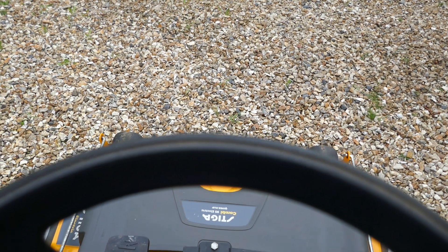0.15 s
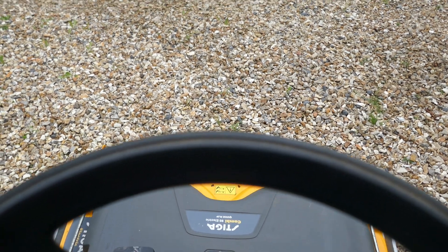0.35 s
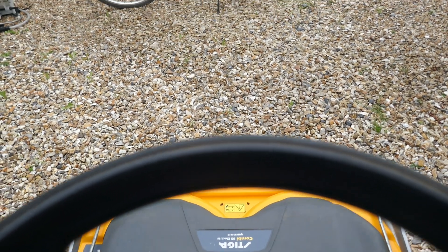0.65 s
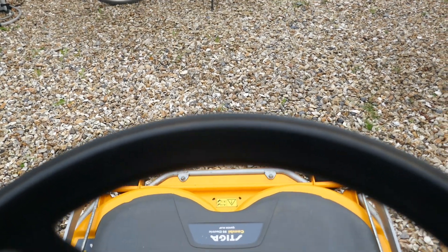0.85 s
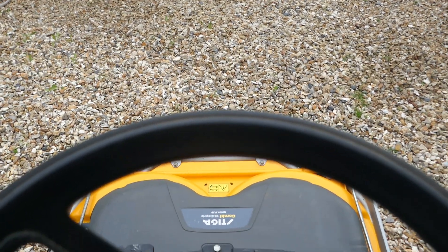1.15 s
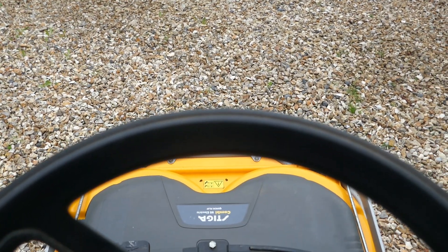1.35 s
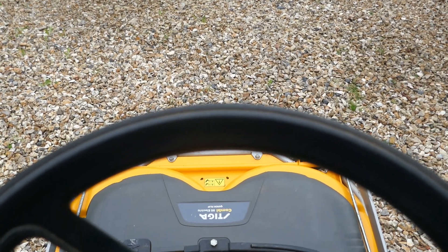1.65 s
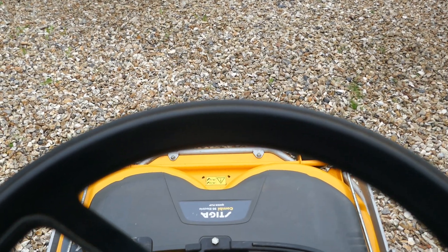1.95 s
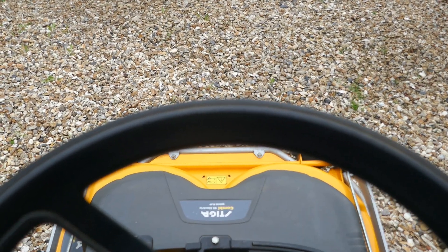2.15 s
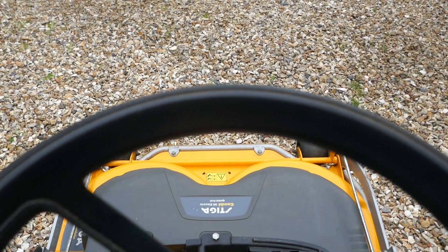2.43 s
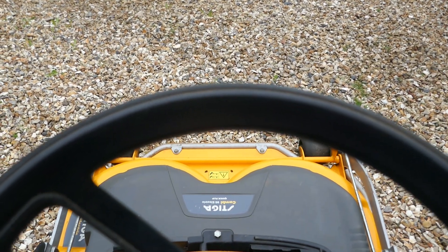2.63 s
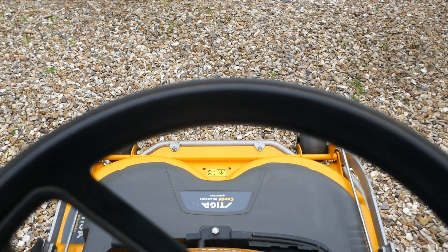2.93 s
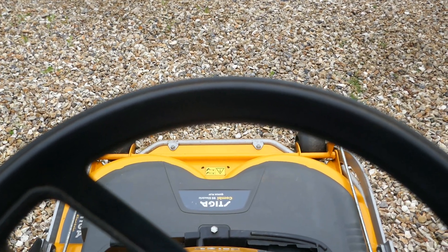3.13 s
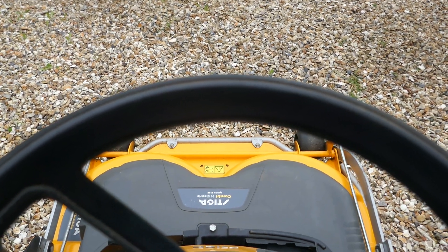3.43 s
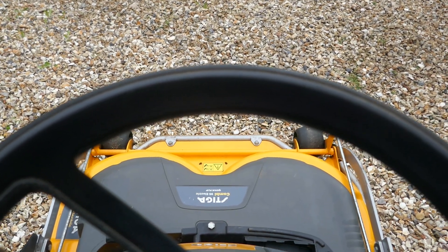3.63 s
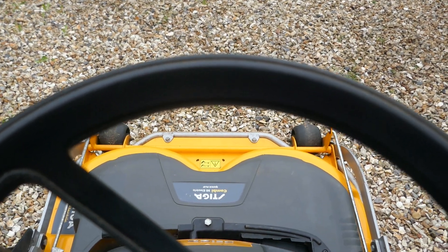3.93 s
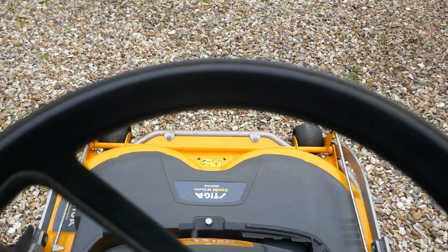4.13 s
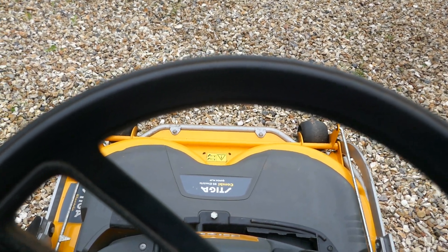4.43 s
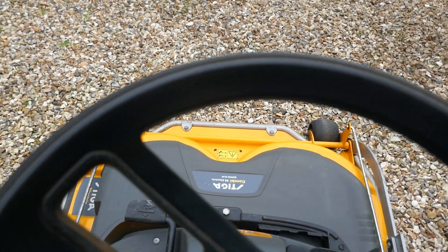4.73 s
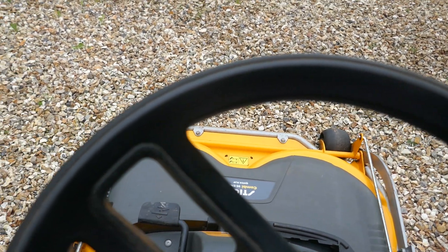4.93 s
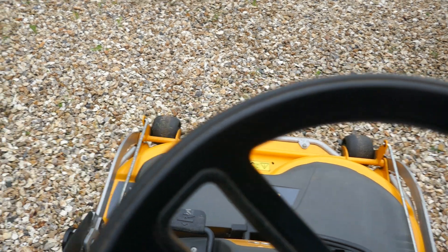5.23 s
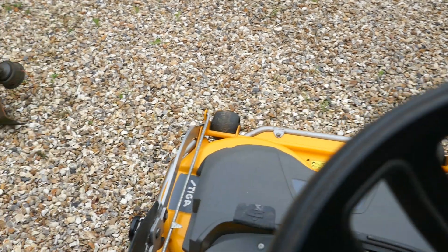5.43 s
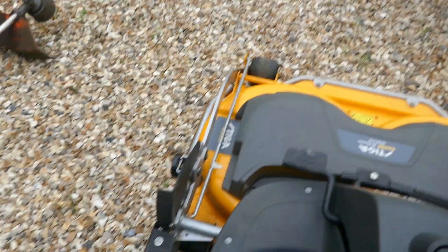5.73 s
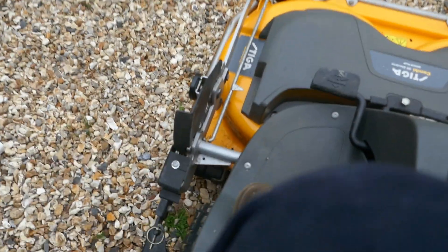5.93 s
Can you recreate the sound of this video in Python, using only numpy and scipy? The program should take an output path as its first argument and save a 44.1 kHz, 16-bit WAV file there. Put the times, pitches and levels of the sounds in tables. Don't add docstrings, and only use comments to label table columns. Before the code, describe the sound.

Outdoors, recorded very close from the driver's seat of a small ride-on mower. Quiet low ambience and faint microphone hiss at first, with a dull bump at 0 s, a slight boot scuff, a hard hollow knock at 0.5 s, softer thuds, and small seat creaks around 0.8 and 1.25 s. At about 1.55 s the starter engages: quick irregular clanks, thumps and a brief scrape. The engine catches around 2 s and settles into a steady single-cylinder idle, about eighteen thuds a second, with muffler ring, pump hum, frame rumble and rattling panels. At 3.7-3.9 s it speeds up with a harder, louder bark, then again near 4.4 s to about twenty-five beats a second, holding steady with more hiss and rattle. From 5.3 s the driver stands: cloth rustles increasingly close, a panel knock at 5.57 s, a sharp click at 5.7 s. The engine runs on, slightly softer in its low thud, to 6 s.

```python
import sys
import numpy as np
from scipy import signal
from scipy.fft import rfft, irfft, next_fast_len
from scipy.io import wavfile
from scipy.ndimage import uniform_filter1d

SR = 44100
rng = np.random.default_rng(int(sys.argv[2]) if len(sys.argv) > 2 else 0)


def generate_wav(signal):
    frames = np.transpose(np.atleast_2d(signal))
    scaled = np.clip(frames, -1, 1) * 32767
    pcm = np.round(scaled).astype(np.int16)
    wavfile.write(sys.argv[1], SR, pcm)


def boost_factor(decibels):
    exponent = np.asarray(decibels, float) / 20
    return 10 ** exponent


N = 268128
TIME = np.arange(N) / SR
BINS, FRAMES = np.fft.rfftfreq(1024, 1 / SR), np.arange(N // 256 + 5) * 256 / SR
KEY_S, CAUGHT_S, STANDS_UP_S = 1.55, 1.95, 5.35


def evened(x):
    return x / np.sqrt(np.mean(x ** 2) + 1e-20)


def read(points, hz):
    f, value = np.transpose(points)
    return np.interp(np.log(hz + 1), np.log(f + 1), value)


def paint(colour):
    return boost_factor(read(colour, BINS))[:, None]


def curves(rows):
    s, *columns = np.transpose(rows)
    return [np.interp(TIME, s, c) for c in columns] + [1. * (TIME >= s[0])]


def ramp(start_s, length_s):
    return np.clip((TIME - start_s) / length_s, 0, 1)


def strokes(rows, edge_s):
    power = 0
    for start_s, length_s, level_db in rows:
        shape = ramp(start_s, edge_s) * (1 - ramp(start_s + length_s, edge_s))
        power = power + boost_factor(level_db) ** 2 * shape ** 2
    return power


def add(mix, start_s, sound):
    part = mix[round(start_s * SR):][:len(sound)]
    part += sound[:len(part)]


# freq_hz, likeness_0_1
LIKENESS = [(30, .8), (70, .97), (300, .97), (600, .93), (1200, .8), (2200, .7), (4000, .4), (9000, .45),
            (14000, .4)]


def noise(field, patchy_db):
    a, b, c, d, patches = rng.standard_normal((5, 513, len(FRAMES)), dtype=np.float32)
    patches = uniform_filter1d(patches, size=4, axis=0)
    patches = evened(uniform_filter1d(patches, size=14, axis=1))
    same = np.clip(read(LIKENESS, BINS), 0, 1)[:, None]
    left = a + 1j * b
    right = same * left + np.sqrt(1 - same ** 2) * (c + 1j * d)
    z = np.array([left, right]) * field * boost_factor(patchy_db * patches)
    return evened(signal.istft(z, nperseg=1024, noverlap=768)[1][:, :N])


# time_s, firings_per_s
SPEED = [(2.09, 15.559), (2.25, 18.387), (2.45, 18.212), (2.85, 18.638), (3.2, 18.305), (3.45, 18.619),
         (3.65, 18.408), (3.85, 21.68), (4.0, 22.169), (4.17, 22.065), (4.45, 24.815), (4.6, 25.185),
         (4.8, 24.769), (5.05, 25.036), (5.8, 24.879), (6.08, 25.328)]


def crank():
    speed, on = curves(SPEED)
    first_turn = .002
    return first_turn + np.cumsum(speed * on) / SR


def above_idle():
    speed, on = curves(SPEED)
    return speed - 18.4


def dying_rings(rows, rough, rise_s, cycles=3):
    out, t = np.zeros(N), np.arange(6000) / SR
    for start_s, peak_db, hz, t60_s in rows:
        window = np.hanning(int(cycles * SR / hz))
        smear = evened(np.convolve(rng.standard_normal(len(t)), window, "same"))
        shape = boost_factor(peak_db + 3 - 60 * t / t60_s) * (1 - np.exp(-t / rise_s))
        add(out, start_s, shape * (1 - rough + rough * smear) * np.sin(2 * np.pi * hz * t))
    return out


# freq_hz, level_db_per_hz
AIR = [(29, -42), (50, -18), (70, -1.5), (124, -1.5), (347, -6.5), (470, 1), (575, -5), (716, 4),
       (805, -26), (1050, -26), (1170, -4.5), (1430, -6), (1580, -14.5), (1970, -7), (2800, -22.5),
       (3640, -53), (6160, -120)]
# freq_hz, level_db_per_hz
SELF_NOISE = [(2000, -23), (2800, -8), (4800, -4), (5600, -8), (7900, -11), (10000, -4.5), (12000, -7.5),
              (15000, -14), (15700, -5)]


def background():
    colour = np.hypot(paint(AIR), boost_factor(-20.5) * paint(SELF_NOISE))
    side_db = -50 + 6 * np.array([[.5], [-.5]])
    return boost_factor(side_db) * noise(colour, patchy_db=1.5)


# start_s, peak_db, pitch_hz, t60_s
BLOWS = [(0.0, -25.5, 280, 0.041), (0.103, -36, 219, 0.18), (0.135, -32, 270, 0.046),
         (0.163, -35, 217, 0.08), (0.433, -36, 127, 0.074), (0.515, -13.5, 323, 0.034),
         (0.522, -16.5, 153, 0.045), (0.526, -13, 189, 0.042), (0.553, -19, 380, 0.045),
         (0.641, -26, 110, 0.085), (0.682, -29, 153, 0.032), (0.704, -31, 105, 0.076),
         (0.892, -45, 99, 0.13), (1.039, -21.5, 218, 0.03), (1.203, -32.5, 390, 0.07),
         (1.587, -9, 267, 0.13), (1.609, -12, 241, 0.063), (1.723, -4.5, 263, 0.033),
         (1.745, -2.5, 202, 0.11), (1.8, -10.5, 124.9, 0.1), (1.826, -10.5, 267, 0.1),
         (1.884, -3, 205, 0.21), (1.9198, -11.5, 195, 0.32), (1.973, -10, 157, 0.11),
         (2.008, -7.5, 152, 0.16), (2.034, -8.5, 252, 0.065), (2.053, -4.5, 191, 0.19),
         (2.092, -9.5, 152, 0.094)]


def body_blows():
    return dying_rings(BLOWS, rough=0.35, rise_s=0.0036)


# freq_hz, level_db_per_hz
RUMBLE = [(40, -50), (100, -30), (180, -14), (260, -4), (350, 0), (460, -8), (570, -2), (670, -18),
          (900, -22), (1200, -50), (3000, -110)]
# freq_hz, level_db_per_hz
RATTLE = [(350, -17), (600, -26), (667, -18), (742, -5.5), (953, -13.5), (1050, -9), (1200, -14.5),
          (1600, -13.5), (2520, -26), (2970, -34.5), (6000, -52), (7800, -80), (13200, -120)]
# start_s, length_s, level_db
SCUFF = [
    (.09, 0.093, -27.5),
]
STILL_S = 1.3
CRANKED_DB, RUNNING_DB = (-27.5, -37.5), (-24, -35.5)
KNOCKED_DB, KNOCKED_T60_S = (-20, -38), 0.065
RESTING_DB, EXPOSED_DB = -53.5, 4
RATTLE_SPEED_DB = 0.3641


def shake(turns):
    caught, t = ramp(CAUGHT_S, 0.14), np.arange(6000) / SR
    knocked = np.sqrt(strokes(SCUFF, 0.031))
    for start_s, peak_db, hz, t60_s in BLOWS:
        if start_s < KEY_S:
            add(knocked, start_s, boost_factor(peak_db - 60 * t / KNOCKED_T60_S) * (1 - np.exp(-t / 0.0012)))
    rumble, rattle = (ramp(KEY_S, 0.023) * boost_factor(a + (b - a) * caught)
                      for a, b in zip(CRANKED_DB, RUNNING_DB))

    rattle = rattle * boost_factor(RATTLE_SPEED_DB * np.maximum(above_idle(), 0) + EXPOSED_DB * ramp(STANDS_UP_S, 1.0))
    burst_db = 3 * np.exp(-((turns - .13) % 1) / 0.17)
    jolts = rattle * boost_factor(burst_db)
    jolts += boost_factor(RESTING_DB) * (1 - 0.41 * ramp(STILL_S, .05))
    jolts += boost_factor(KNOCKED_DB[1]) * knocked
    for start_s, peak_db, hz, t60_s in CLANKS:
        add(jolts, start_s, boost_factor(peak_db - 3 - 60 * t / t60_s) * (1 - np.exp(-t / 0.00054)))

    stir_db = 1.8 * np.cos(2 * np.pi * (turns - .15))
    away_db = -3 * ramp(STANDS_UP_S, 0.47)
    rumble = rumble * boost_factor(-1.0 + stir_db + away_db) + boost_factor(KNOCKED_DB[0]) * knocked
    return rumble * noise(paint(RUMBLE), patchy_db=0.5) + jolts * noise(paint(RATTLE), patchy_db=1.5)


# start_s, peak_db, pitch_hz, t60_s
CREAKS = [
    (0.3373, -41, 2010, 0.14),
    (0.7876, -32.5, 2010, 0.088),
    (1.1097, -47, 1800, 0.27),
    (1.143, -44, 1800, 0.2),
    (1.263, -26.5, 2070, 0.065),
]


def seat_creaks():
    return dying_rings(CREAKS, rough=.8, rise_s=.02, cycles=9)


# start_s, peak_db, pitch_hz, t60_s
CLANKS = [(0.5173, -33, 1355, 0.033), (1.5588, -29.5, 1574, 0.19), (1.5768, -21.5, 1720, 0.1),
          (1.6342, -33.5, 1350, 0.1), (1.7831, -24.5, 1486, 0.086), (1.805, -32, 1250, 0.27),
          (1.841, -25, 1880, 0.063), (1.8744, -35, 1290, 0.036), (1.917, -29, 1270, 0.034),
          (1.95, -35, 1480, 0.051), (2.0109, -21.5, 1410, 0.087), (2.03, -51, 1380, 0.09),
          (2.0858, -19, 1367, 0.044), (2.134, -29, 1420, 0.036)]


def gear_clanks():
    return dying_rings(CLANKS, rough=0.75, rise_s=0.0024)


# start_s, peak_db, pitch_hz, t60_s
RINGS = [(0.519, -8, 437, 0.02), (1.204, -32, 760, 0.049), (1.563, -21.5, 595, 0.11),
         (1.578, -8, 585, 0.066), (1.622, -8.5, 560, 0.034), (1.689, -16.5, 607, 0.096),
         (1.759, -8, 557, 0.063), (1.799, -7.5, 584, 0.084), (1.844, -20, 630, 0.053),
         (1.884, -36, 515, 0.045), (1.996, -11, 550, 0.032), (2.034, -26, 637, 0.044),
         (5.53, -28, 567, 0.045), (5.568, -9, 563, 0.036)]


def panel_rings():
    return dying_rings(RINGS, rough=0.073, rise_s=0.0069)


# freq_hz, level_db_per_hz
GRIND = [(1180, -33), (2000, -4), (4190, -22), (4560, -12.5), (5510, -21), (6270, -21), (8110, -22.5),
         (9880, -17), (14500, -28), (15600, -30)]
# freq_hz, level_db_per_hz
CLOTH = [(1760, 4), (3000, 1), (4180, -6.5), (5280, -4.5), (5770, -9), (6960, -7.5), (8910, -4),
         (10500, -3), (11700, -7), (14000, -10), (15600, -19)]
# freq_hz, level_db_per_hz
FAN = [(3000, -43), (4400, -2.5), (5100, 0), (5800, -8), (7500, -7), (9500, -3.5), (10500, -3),
       (12000, -13), (15600, -10)]
# start_s, length_s, level_db
SCRAPES = [
    (1.565, 0.042, -44),
    (1.6, 0.21, -51.5),
    (1.775, 0.058, -39),
    (1.83, 0.049, -45),
    (2.0, .05, -55),
    (2.085, 0.055, -54),
]
# start_s, length_s, level_db
RUBS = [
    (3.82, 0.079, -58),
    (4.72, .45, -55.5),
    (5.33, .8, -49),
    (5.45, .8, -47),
    (5.58, .6, -45),
    (5.8, .4, -43),
]


def hiss():
    fan_db = -61.5 + 0.35 * above_idle()
    fan = boost_factor(fan_db) ** 2 * (1e-4 + ramp(KEY_S, 0.68))
    powers = [strokes(SCRAPES, 0.012), strokes(RUBS, 0.035), fan]
    total = sum(powers)
    field = 0
    for power, colour in zip(powers, (GRIND, CLOTH, FAN)):
        field = field + np.interp(FRAMES, TIME, power / total) * evened(paint(colour)) ** 2
    return np.sqrt(total) * noise(np.sqrt(field), patchy_db=1.2)


# firing_rate_multiple, level_db
ROCKING = [(2, -60)]


def rocking(turns):
    speed_db = 2 * above_idle()
    orders = sum(boost_factor(db + speed_db) * np.sin(2 * np.pi * k * turns) for k, db in ROCKING)
    return ramp(CAUGHT_S, .2) * orders


# start_s, peak_db, pitch_hz, t60_s
SNAPS = [
    (2.087, -44, 3980, .05),
    (3.846, -50, 12500, 0.13),
    (5.405, -41, 6900, 0.017),
    (5.591, -41, 11900, .04),
    (5.6934, -31, 9900, .006),
    (5.6995, -15.5, 9060, 0.011),
    (5.7, -30, 3670, .008),
    (5.7463, -34, 11000, .013),
]


def close_snaps():
    return dying_rings(SNAPS, rough=.9, rise_s=.0006, cycles=2.5)


# time_s, load_0_1
LOAD = [
    (2.09, 0.5),
    (2.4, 0.68),
    (3.66, 0.44),
    (3.9, 1),
    (4.28, .9),
    (4.45, 0.47),
    (5.4, 0),
    (5.8, 0),
    (6.08, 0.35),
]
# delay_s, level_db
ECHOES = [
    (.0134, -1),
    (.0272, -5),
]
# freq_hz, width_hz, level_db
MUFFLER = [
    (557.5, 35.7, 2),
    (412, 33, -5.5),
    (609, 110, -14),
]
UNEVEN, JITTER_S = .085, .004
THUMP_DB, RING_DB, ECHO_DB = -20.5, -31.5, -7
THUMP_LOAD_DB, RING_LOAD_DB, ECHO_LOAD_DB = -1.5, 12, 0.5
THUMP_SPEED_DB, ECHO_SPEED_DB = -0.32, .5
HOT_PER_S, COOLING = 25, .032
BLOW_S, LINGER_S, ECHO_HZ = 0.0041, 0.00027, 212.2
SHELL_LATE_S, SHELL_RISE_S = 0.00729, .0015


def engine(turns):
    load, on = curves(LOAD)
    away_db = -3 * ramp(STANDS_UP_S, 0.53)
    thump_db = THUMP_DB + THUMP_LOAD_DB * load + THUMP_SPEED_DB * above_idle() + away_db
    ring_db = RING_DB + RING_LOAD_DB * load + away_db
    echo_db = ECHO_DB + ECHO_LOAD_DB * load + ECHO_SPEED_DB * above_idle()
    out, t = np.zeros(N + SR), np.arange(-441, 2600) / SR
    fires = np.flatnonzero(np.diff(np.floor(turns)) > 0)
    scatter = UNEVEN * rng.standard_normal((len(fires), 10))
    for i, u in zip(fires, scatter):
        speed = SR * (turns[i + 1] - turns[i])
        cool = HOT_PER_S - speed
        blow_hz = 112 + 2.89 * speed
        width_s = BLOW_S + (t > 0) * LINGER_S * cool
        thump = -np.exp(-(t / width_s) ** 2) * np.cos(2 * np.pi * blow_hz * t)
        for k, (delay_s, db) in enumerate(ECHOES):
            at = t - delay_s * (1 + COOLING * cool) - .002 * u[k]
            echo = np.exp(-(at / BLOW_S) ** 2) * np.cos(2 * np.pi * ECHO_HZ * at)
            thump -= boost_factor(db + echo_db[i] + 20 * u[3 + k]) * echo

        at = np.maximum(t - SHELL_LATE_S - 0.0045 * u[6], 0)
        ring = 0
        for k, (hz, width_hz, db) in enumerate(MUFFLER):
            mode = np.exp(-np.pi * width_hz * at) * np.sin(2 * np.pi * hz * at)
            ring = ring + boost_factor(db + 5.2 * u[7 + k]) * mode
        ring = ring * (1 - np.exp(-at / SHELL_RISE_S))
        firing = boost_factor(thump_db[i] + 11 + 4.1 * u[2]) * thump + boost_factor(ring_db[i] + 8.0) * ring
        add(out, (i - 441) / SR + JITTER_S * u[5], firing)
    return out[:N]


# time_s, pump_turns_per_firing
BELT = [(2.1, 3.447), (3.6, 3.448), (3.9, 3.475), (4.3, 3.475), (4.6, 3.47), (6.08, 3.46)]
PUMP = [-3, -0.5, -9.5, 1.5]
# freq_hz, gain_db
HOUSING = [(190, -37.5), (230, -25), (257, -29.5), (313, -39), (346, -31.5), (382, -26.5), (433, -54.5),
           (520, -42)]


def pump(turns):
    ratio, on = curves(BELT)
    step = ratio * np.gradient(turns)
    angle = 2 * np.pi * np.cumsum(step)
    levels_db = [-40]
    levels_db += [db + read(HOUSING, (k + 3) * step * SR) for k, db in enumerate(PUMP)]
    slow = evened(uniform_filter1d(rng.standard_normal((len(FRAMES), 5)), size=12, axis=0)).T
    hum = 0
    for k, db in enumerate(levels_db):
        waver_db = 0.67 * np.interp(TIME, FRAMES, slow[k])
        hum = hum + np.sqrt(2) * boost_factor(db + waver_db) * np.sin((k + 2) * angle + k * k)
    return ramp(BELT[0][0], 0.078) * hum


def scene():
    turns = crank()
    hits = body_blows() + seat_creaks() + gear_clanks() + panel_rings() + close_snaps()
    motor = shake(turns) + rocking(turns) + engine(turns) + pump(turns)
    return background() + hits + motor + hiss()


def low_pass(x):
    return signal.sosfilt(signal.butter(12, 15730, fs=SR, output="sos"), x)


# freq_hz, level_db
LEAN = [(30, -4), (125, -0.4), (250, -1), (350, 0.5), (600, -4.5), (1200, -10), (2200, -4.5), (4000, 1.5),
        (5500, 2), (8500, 20.5), (12000, 7.5), (15000, 12)]
# freq_hz, lead_rad
LEAD = [(50, 0.27), (200, 0.17), (500, 0.51), (1000, 0.17), (3000, 0.66), (15000, 0.89)]


def record(dry):
    size = next_fast_len(N + 4096)
    hz = np.fft.rfftfreq(size, 1 / SR)
    sides = np.array([[1], [-1]])
    tilt = boost_factor(sides * read(LEAN, hz) / 2)
    ports = tilt / tilt.mean(axis=0) * np.exp(.5j * sides * read(LEAD, hz))
    ports *= (hz < 15740) / np.sqrt(1 + (70 / (hz + 1)) ** 6)
    mix = irfft(rfft(dry, size) * ports, size)[:, :N]
    return low_pass(mix)


dry = scene()
out = record(dry)
generate_wav(out)
```